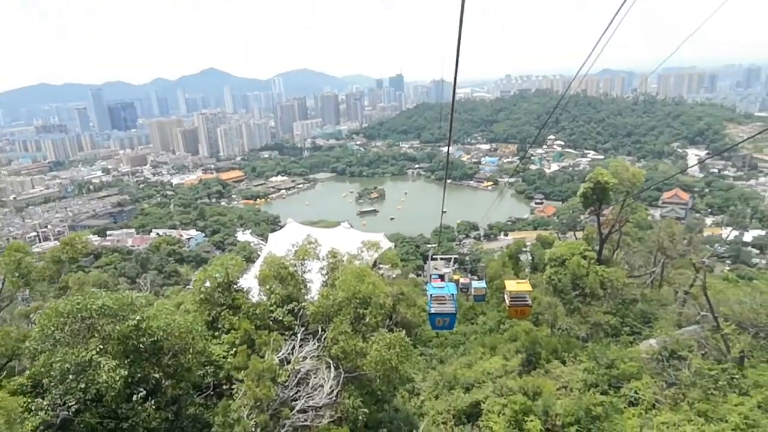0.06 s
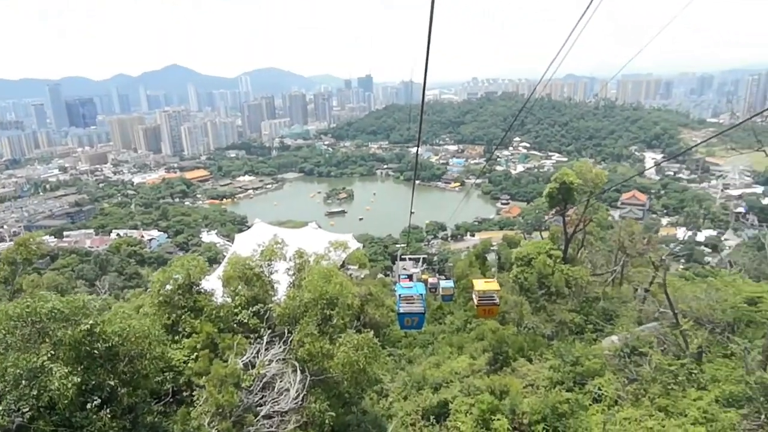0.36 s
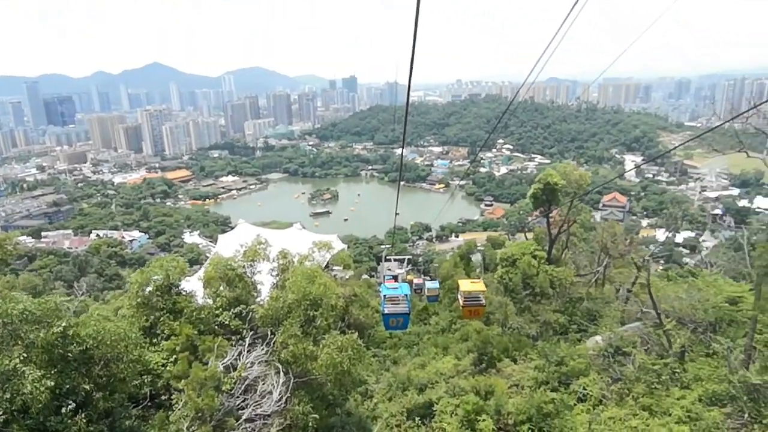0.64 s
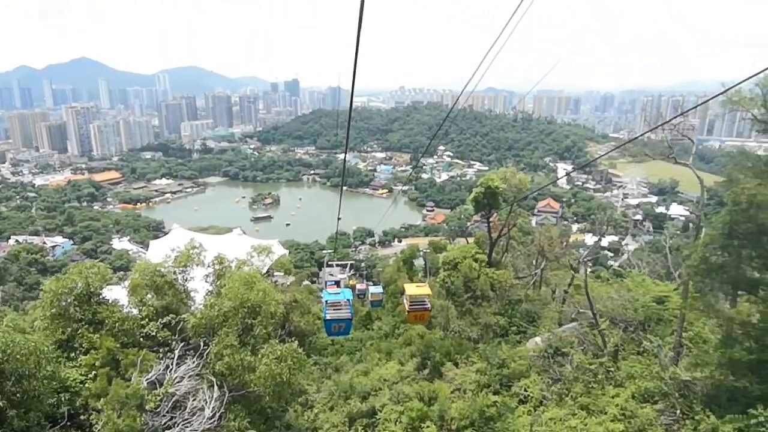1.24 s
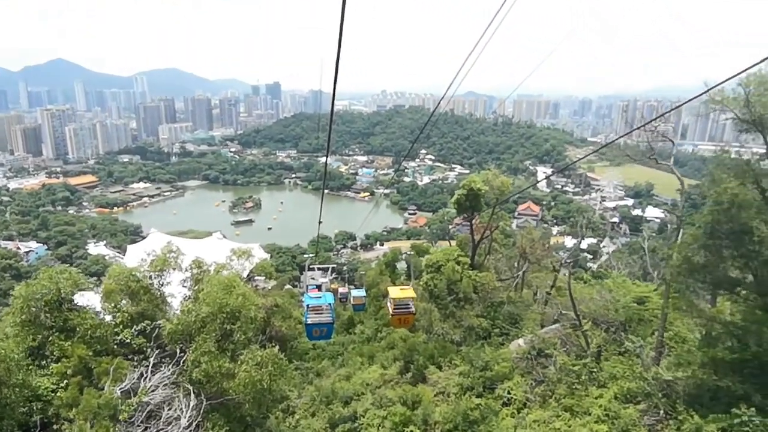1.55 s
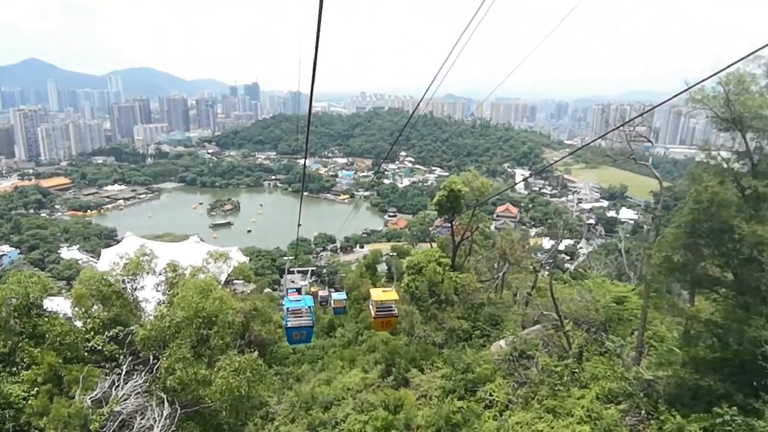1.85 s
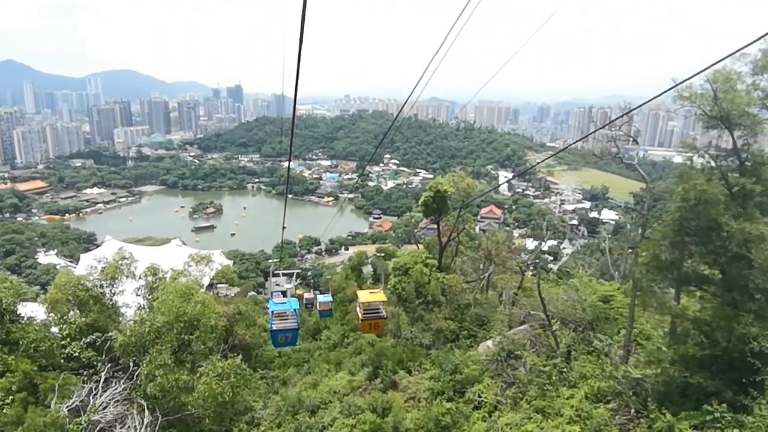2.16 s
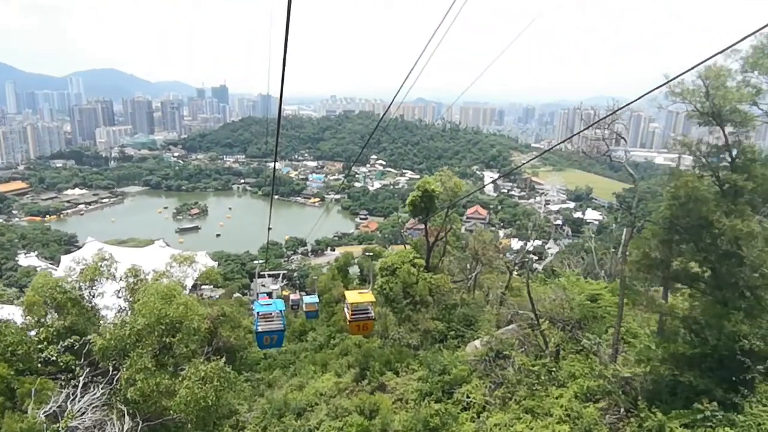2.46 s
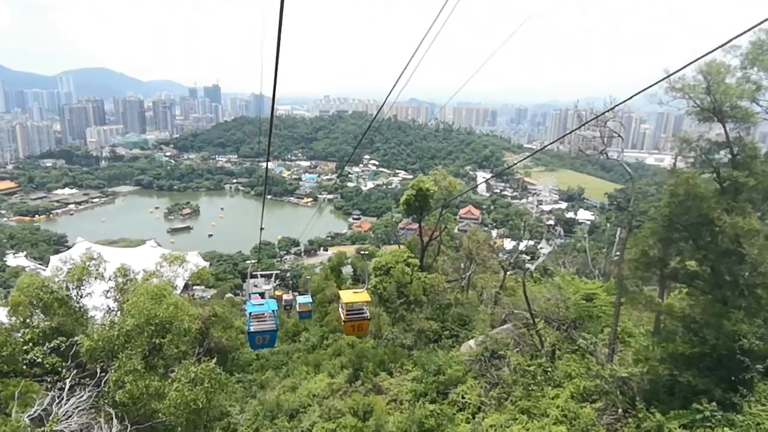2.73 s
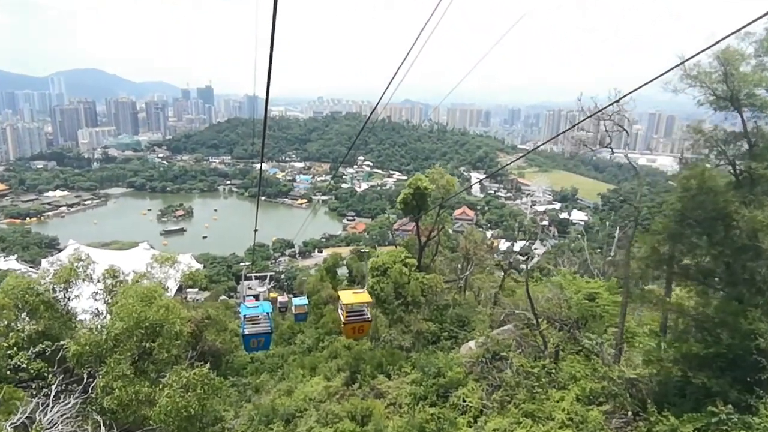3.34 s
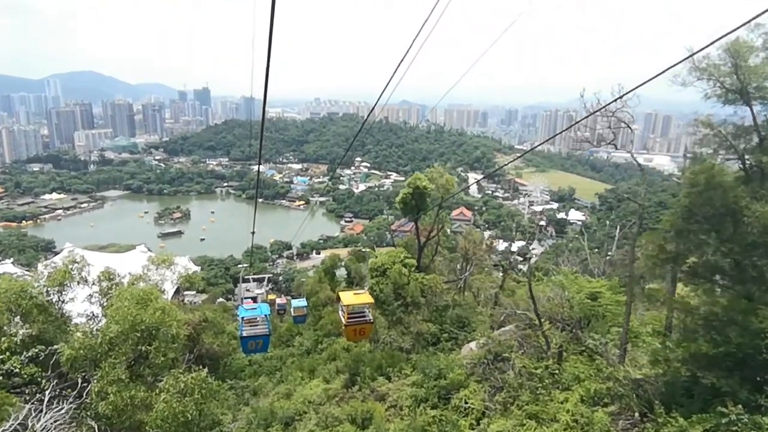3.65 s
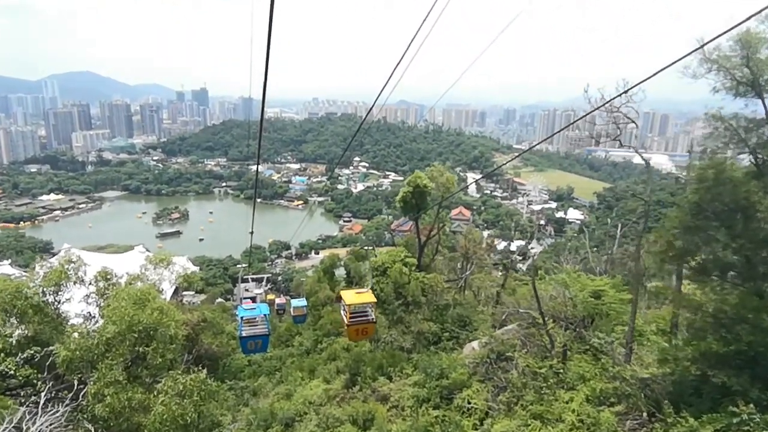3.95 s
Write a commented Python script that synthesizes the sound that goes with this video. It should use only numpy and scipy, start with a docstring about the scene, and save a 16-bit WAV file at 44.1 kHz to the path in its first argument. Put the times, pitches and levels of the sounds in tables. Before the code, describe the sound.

Low, gusty wind rumble on the microphone and two hard knocks inside a cable car.

```python
"""Inside a moving cable car, wind buffets a hand-held microphone: eddies rumble, and tear into flutter
in the gusts. The left channel gets the same wind slightly later and duller. The car runs with a soft
hiss, faint metallic singing and a brief rustle of rubbed metal. Faint bird chirps and a thin squeak
are heard over the running car. Small rubs of the grip lead in two hard handling knocks, which crack
on the plastic shell and ring in the cabin."""
import sys
import numpy as np
from scipy import signal
from scipy.fft import rfft, irfft
from scipy.io import wavfile
from scipy.ndimage import uniform_filter1d, minimum_filter1d

SR = 44100
rng = np.random.default_rng(int(sys.argv[2]) if len(sys.argv) > 2 else 0)


def transcribe(signal):
    """Save signal, clipped to [-1, 1], as a 16-bit WAV file at the path in sys.argv[1]."""
    frames = np.atleast_2d(signal).T
    limited = np.clip(frames, -1, 1)
    pcm = np.round(limited * 32767).astype(np.int16)
    wavfile.write(sys.argv[1], SR, pcm)


N = 176400
TIME_S = np.arange(N) / SR
BIN_HZ = np.maximum(np.arange(N // 2 + 1) * SR / N, 1)


def undb(db):
    """Decibels to gain."""
    return 10 ** (np.asarray(db) / 20)


def unit(x):
    """Scale to rms 1."""
    return x / np.sqrt(np.mean(x ** 2))


def curve(rows):
    """Gain along (time_s, level_db) points."""
    return undb(np.interp(TIME_S, *np.array(rows).T))


def colour(x, spectrum):
    """Filter by (freq_hz, level_db) points, to rms 1."""
    hz, db = np.array(spectrum).T
    skirts = np.minimum(BIN_HZ / hz[0], 1) ** 2 * np.minimum(hz[-1] / BIN_HZ, 1) ** 4
    gain = undb(np.interp(np.log(BIN_HZ), np.log(hz), db))
    return unit(irfft(rfft(x) * skirts * gain, N))


def noise(spectrum):
    """Coloured noise, rms 1."""
    return colour(rng.standard_normal(N), spectrum)


def band(hz, width_hz):
    """Noise in one resonance; at 0 Hz, a random waver."""
    resonance = 1 / (1 + (2 * (BIN_HZ - hz) / width_hz) ** 2)
    return unit(irfft(rfft(rng.standard_normal(N)) * resonance, N))


def pan(db):
    """Stereo gains for a left-minus-right level."""
    return undb(np.array([[db], [-db]]) / 2)


def diffuse(spectrum, pan_db):
    """Independent noise per side, panned; the treble stays centred."""
    lean = 1 / (1 + (BIN_HZ / 4200) ** 4)
    both = np.array([noise(spectrum), noise(spectrum)])
    return irfft(rfft(both) * pan(pan_db) ** lean, N)


def even(x, window_s=0.079):
    """Level out slow swells."""
    return x / np.sqrt(uniform_filter1d(x ** 2, int(window_s * SR)) + 1e-9)


# steady flow over the port: time_s, force_db
FLOW = [(0, -30), (.12, -51.5), (.7, -46), (1.2, -41.5), (1.33, -27.5), (1.45, -42.5), (1.5, -29.5),
        (2.05, -22.5), (2.35, -35.5), (2.55, -24.5), (2.85, -34), (3.25, -32.5), (3.4, -43), (3.78, -38),
        (3.85, -65.5), (4, -42.5)]
# puffs: start_s, force_db, length_s
PUFFS = [(.005, -26, 0.022), (0.172, -37.5, 0.048), (0.292, -37, 0.035), (0.375, -33.5, 0.037),
         (0.444, -34.5, 0.019), (0.561, -39.5, 0.045), (.79, -37.5, 0.032), (1.475, -29.5, 0.027),
         (1.7, -30, 0.029), (1.842, -15, 0.036), (2.121, -18, .03), (2.166, -14.5, 0.031),
         (2.251, -27.5, 0.064), (2.431, -22, 0.038), (2.519, -17.5, 0.078), (2.661, -22, 0.011),
         (2.761, -19.5, .025), (2.966, -26.5, 0.092), (3.426, -17.5, 0.012), (3.461, -19.5, 0.0077),
         (3.674, -33, 0.014)]


def wind_force(edge_s=0.0049):
    """Steady flow plus puffs that strike the port and leave as quickly."""
    def gate(start):
        return (1 + np.tanh((TIME_S - start) / edge_s)) / 2

    puff_power = sum(undb(db) ** 2 * (gate(start) - gate(start + length)) ** 2
                     for start, db, length in PUFFS)
    return np.sqrt(curve(FLOW) ** 2 + puff_power)


def buffeting(swing, force, cusp=0.096, growth=0.78):
    """Pressure swings with pointed crests; they grow with force, then saturate."""
    saturation = undb(-32)
    pointed = swing + cusp * (swing ** 2 - 1)
    return pointed * saturation * (force / np.hypot(force, saturation)) ** growth * undb(15)


# shed-eddy spectra: freq_hz, level_db
FLUTTER_SPECTRUM = [(230, -10.5), (400, 3.5), (520, 4.5), (750, -6), (1200, -21), (2000, -27),
                    (3500, -58.5)]
SPATTER_SPECTRUM = [(800, 12), (1300, -3.5), (2200, -9), (3000, -24.5)]


def shedding(pressure, force, base_rate_hz=600, tear=0.65, spread_db=2.5, flicker_db=4):
    """Tiny eddies break off mostly at crests; spatter grows faster with force than flutter."""
    crest = np.tanh(pressure / 2) * 2
    hits = rng.random(N) < base_rate_hz / SR * np.exp(tear * crest)
    grains = unit(hits * undb(spread_db * np.clip(rng.standard_normal(N), -2, 2)))
    shed = grains + 0.45 * rng.standard_normal(N)
    shed = shed * np.exp(tear * crest / 2) * undb(flicker_db * band(0, 72))
    flutter = even(colour(shed, FLUTTER_SPECTRUM)) * force * undb(1)
    spatter = even(colour(shed, SPATTER_SPECTRUM)) * force ** 1.5 / 2 * undb(-10.5)
    return flutter + spatter


def left_port(pressure, lag_s=0.00059, cutoff_hz=350, leak=0.11):
    """The left port gets the same wind later and duller."""
    delay = np.exp(-2j * np.pi * BIN_HZ * lag_s)
    lowpass = leak + (1 - leak) / (1 + 1j * BIN_HZ / cutoff_hz)
    return irfft(rfft(pressure) * delay * lowpass, N)


# deep rumble envelope: time_s, level_db
RUMBLE_LEVEL = [(0, -12.5), (.22, -15.5), (.29, -10), (.55, -13), (.74, -19), (1.17, -18), (1.25, -17),
                (1.62, -16.5), (1.77, -27), (1.92, -13), (2.25, -15.5), (2.42, -22.5), (2.63, -9.5),
                (2.72, -14), (2.93, -9), (3, -27.5), (3.12, -14.5), (3.26, -7.5), (3.44, -18.5),
                (3.78, -16.5), (4, -30.5)]
# turbulence spectra: freq_hz, level_db
RUMBLE_SPECTRUM = [(25, -8), (55, 0), (105, 1), (150, -3), (260, -24)]
BUFFET_SPECTRUM = [(70, -24.5), (125, -4), (170, -1.5), (260, -4), (370, -9.5), (520, -20.5), (900, -40.5)]


def wind(overload=1.9):
    """Turbulent pressure at the capsule, which rounds off the peaks."""
    deep = even(noise(RUMBLE_SPECTRUM))
    swing = even(noise(BUFFET_SPECTRUM))
    force = wind_force()
    rumble = deep * curve(RUMBLE_LEVEL) * undb(-6)
    buffet = buffeting(swing, force) * thump_gain()
    pressure = rumble + buffet + shedding(swing + deep / 2, force) + strong_eddies()
    right = np.tanh(pressure / overload) * overload
    return np.array([left_port(right), right])


# hiss spectrum: freq_hz, level_db
HISS_SPECTRUM = [(400, -7.5), (1300, 0.5), (2300, 4), (3300, -10.5), (5000, -16.5), (7600, -18.5),
                 (10500, -32), (15500, -34)]
# hiss envelope: time_s, level_db
HISS_LEVEL = [(0, -52), (.25, -54), (1.25, -54), (2.3, -59), (3.4, -58.5), (4, -51.5)]


def running_hiss():
    """Soft hiss of the moving car, wavering slightly."""
    return diffuse(HISS_SPECTRUM, pan_db=-7) * curve(HISS_LEVEL) * undb(0.33 * band(0, 16))


# car and rope tones: pitch_hz, level_db
SINGING_TONES = [(1106, -65.5), (2600, -60.5), (2952, -64)]
# singing envelope: time_s, gain_db
SINGING_LEVEL = [(0, -6.5), (1.1, -3), (2, -31.5)]
METAL_PAN_DB = -7.5


def metal_singing():
    """Car and rope metal sings in narrow, wavering tones."""
    tones = sum(undb(db) * band(hz, width_hz=25) for hz, db in SINGING_TONES)
    return tones * curve(SINGING_LEVEL) * pan(METAL_PAN_DB)


# rubbed-metal modes: pitch_hz, level_db
RUSTLE_MODES = [(3565, -4.5), (3962, -3.5), (5750, -8.5)]
# friction spectrum, metal and grip: freq_hz, level_db
RUB_SPECTRUM = [(1200, -8), (2200, 7.5), (5000, -7), (8000, -6), (11000, -31.5)]


def metal_rustle(centre_s=0.26, sigma_s=0.15):
    """Briefly rubbed metal: a faint scrape and the thin whine of its modes."""
    swell = np.exp(-((TIME_S - centre_s) / sigma_s) ** 2 / 2)
    whine = sum(undb(db) * band(hz, width_hz=hz * 0.025) for hz, db in RUSTLE_MODES)
    scrape = diffuse(RUB_SPECTRUM, METAL_PAN_DB)
    return (scrape * undb(-56) + whine * pan(METAL_PAN_DB) * undb(-62)) * swell


# bird chirps and a squeak: centre_s, pitch_hz, level_db
CHIRPS_AND_SQUEAK = [(.35, 5650, -47.5), (0.594, 6950, -63), (0.929, 7200, -66), (3.46, 3500, -62)]


def birds_and_squeak(glide_hz_per_s=-4000, cycles=140):
    """Faint bird chirps and a thin squeak: rough falling tones, the lower ones longer."""
    out = 0
    for centre, hz, db in CHIRPS_AND_SQUEAK:
        age = TIME_S - centre
        tone = np.sin(2 * np.pi * (hz * age + glide_hz_per_s * age ** 2 / 2))
        envelope = np.exp(-(2 * age * hz / cycles) ** 2)
        out = out + undb(db) * envelope * tone * band(0, width_hz=440)
    return out * pan(-3.75)


# heavy gusts and lulls: centre_s, gain_db
THUMPS = [(0.445, 6), (.58, 6.5), (.71, -1.5), (1.338, 5), (1.514, 6.5), (2.459, -3.5), (2.919, 6),
          (3.038, -8), (3.26, 4.5)]


def thump_gain(half_width_s=0.048):
    """Gain of the buffeting as each heavy gust or lull rolls by."""
    return undb(sum(db * np.exp(-((TIME_S - centre) / half_width_s) ** 2) for centre, db in THUMPS))


def burst(start_s, rise_s, t60_s):
    """Quick rise, exponential fall."""
    age = np.maximum(TIME_S - start_s, 0)
    return (1 - np.exp(-(age / rise_s) ** 2)) * np.exp(-np.log(1000) * age / t60_s)


# grip slips: start_s, level_db
RUBS = [(1.185, -40.5), (1.222, -43.5), (1.259, -47), (1.302, -52.5), (1.786, -44), (1.812, -38.5),
        (1.836, -40.5), (2.03, -54)]


def grip_rubs():
    """Brief scratchy slips of the grip."""
    envelope = sum(undb(db) * burst(start, rise_s=0.0053, t60_s=0.13) for start, db in RUBS)
    return diffuse(RUB_SPECTRUM, pan_db=-2) * envelope


# plastic shell modes: pitch_hz, level_db, t60_s
SHELL_MODES = [(1990, -19.5, .016), (2563, 1, 0.0066), (3250, -19.5, 0.01), (5600, -12.5, .006)]


def shell_crack(start_s, level_db, rise_s=0.0015, left_db=-18):
    """The struck plastic shell rings for milliseconds, mostly on the right."""
    modes = sum(undb(db) * np.sin(2 * np.pi * hz * (TIME_S - start_s)) * burst(start_s, rise_s, t60)
                for hz, db, t60 in SHELL_MODES)
    return modes * undb(level_db + np.array([[left_db], [0]]))


# cabin ring spectrum: freq_hz, level_db
RING_SPECTRUM = [(400, -16), (800, -7), (1500, -7), (2450, 2.5), (3100, -9), (3900, -8.5), (4700, -15),
                 (8200, -13), (10500, -33)]


def cabin_ring(start_s, low_t60_s, bass_db, rise_s=0.001, rattle_db=4):
    """The cabin answers a knock with a snap and a rattling ring; lows and treble decay separately."""
    spectrum = [(hz, db + bass_db * (hz < 1800)) for hz, db in RING_SPECTRUM]
    ring = diffuse(spectrum, pan_db=-8.5) * undb(rattle_db * np.tanh(band(0, width_hz=260)))
    low = signal.sosfiltfilt(signal.butter(2, 3800, fs=SR, output="sos"), ring)
    snap = undb(4) * burst(start_s, rise_s / 2, t60_s=0.022)
    low_envelope = snap / 2 + burst(start_s, rise_s, low_t60_s)
    treble_envelope = snap + burst(start_s, rise_s, t60_s=0.11)
    return low * low_envelope + (ring - low) * treble_envelope


# handling knocks, the second a double hit: start_s, crack_db, ring_db, low_t60_s, bass_db
KNOCKS = [(1.3695, 14.5, -24.5, 0.12, -6), (1.877, -20, -28.5, 0.083, 5), (1.885, -10, -18, .225, 3)]


def knocks():
    """Each hit cracks on the shell and rings the cabin."""
    return sum(shell_crack(start, crack_db) + undb(ring_db) * cabin_ring(start, low_t60, bass_db)
               for start, crack_db, ring_db, low_t60, bass_db in KNOCKS)


# single strong eddies: centre_s, level_db, half_width_ms
EDDIES = [(1.415, -1.5, 0.82), (2.174, -3.5, .33), (2.659, 0, 0.42), (2.797, -9.5, 0.27),
          (3.260, -0.5, 0.56), (3.307, -2, 0.42), (3.342, -2, .6)]


def strong_eddies(suction_width_ratio=3.5):
    """Each eddy is a pointed push inside a broad suction."""
    out = 0
    for centre, db, half_width_ms in EDDIES:
        offset = (TIME_S - centre) * 1000 / half_width_ms
        push = 1 / (1 + offset ** 2)
        suction = 1 / (1 + (offset / suction_width_ratio) ** 2) / suction_width_ratio
        out = out + undb(db) * (push - suction)
    return signal.sosfiltfilt(signal.butter(2, 2600, fs=SR, output="sos"), out)


def scene():
    """Wind, handling, faint bird chirps and a thin squeak over the running car."""
    close = wind() + knocks() + grip_rubs()
    car = metal_singing() + running_hiss() + metal_rustle()
    return close + car + birds_and_squeak()


def record(dry, ceiling=0.94, cutoff_hz=15500):
    """Peak limiter, then a steep low-pass."""
    gain = np.minimum(1, ceiling / (np.abs(dry).max(axis=0) + 1e-9))
    gain = uniform_filter1d(minimum_filter1d(gain, size=129), size=129)
    return signal.sosfilt(signal.ellip(8, .2, 70, cutoff_hz, fs=SR, output="sos"), dry * gain)


dry = scene()
out = record(dry)
transcribe(out)
```